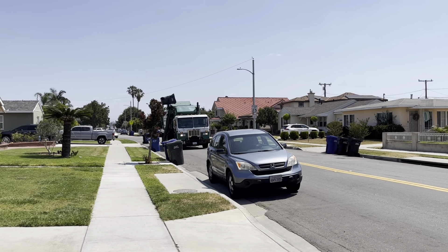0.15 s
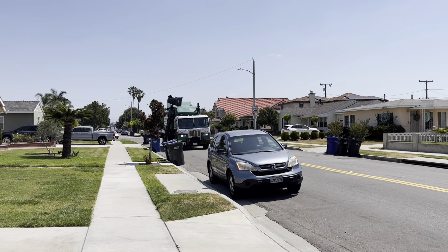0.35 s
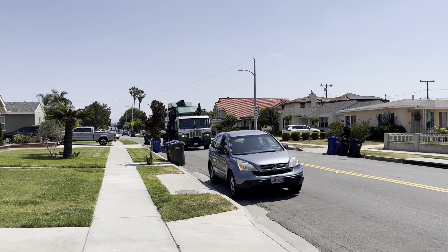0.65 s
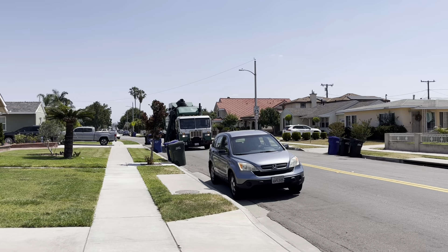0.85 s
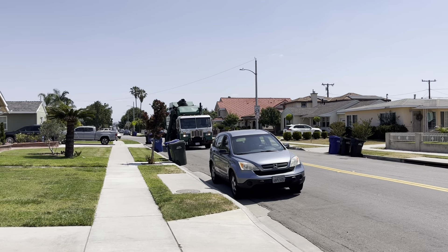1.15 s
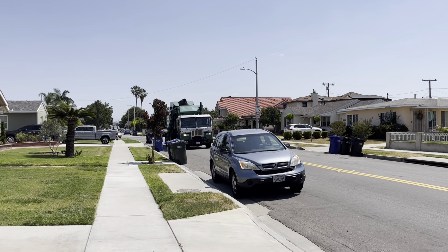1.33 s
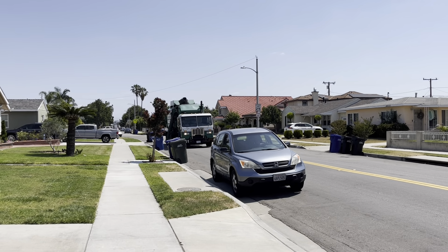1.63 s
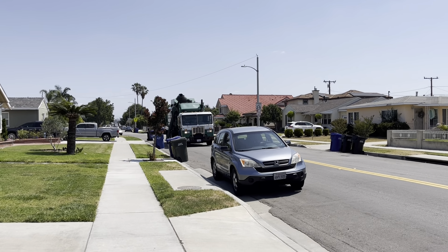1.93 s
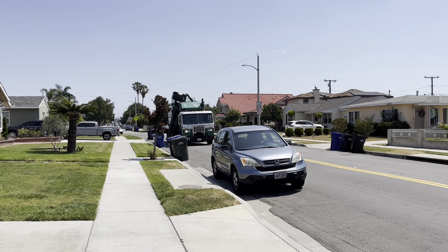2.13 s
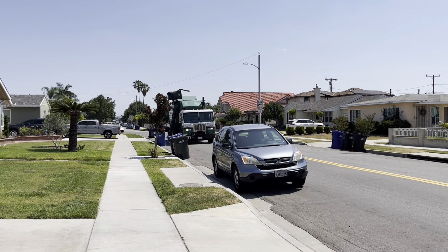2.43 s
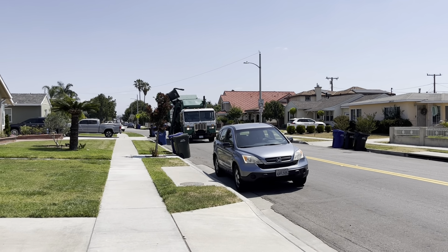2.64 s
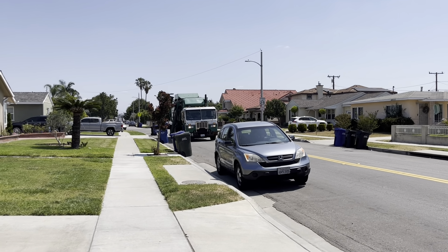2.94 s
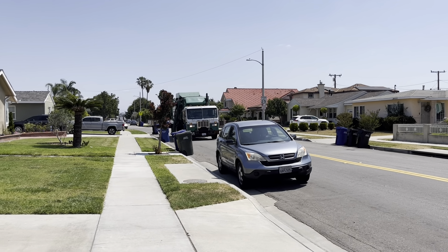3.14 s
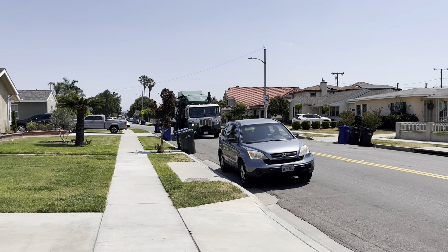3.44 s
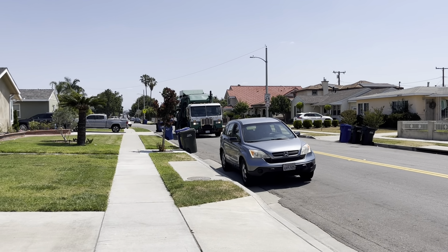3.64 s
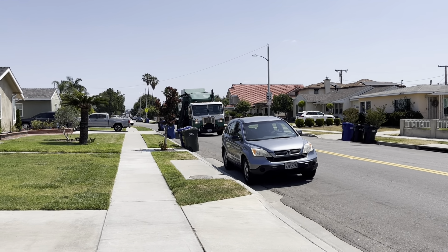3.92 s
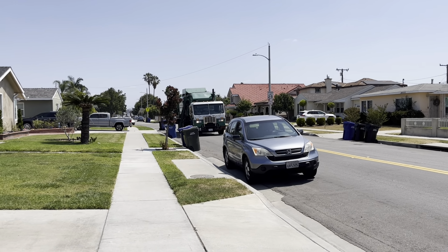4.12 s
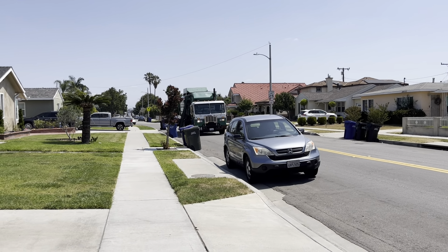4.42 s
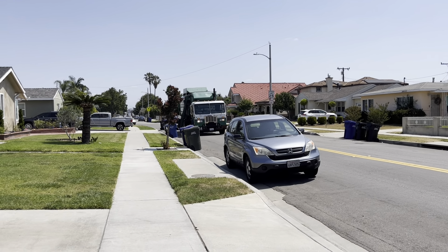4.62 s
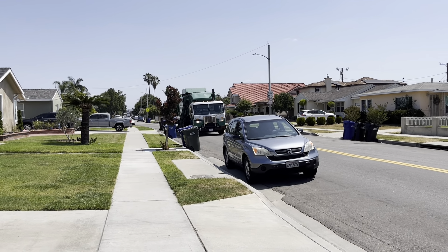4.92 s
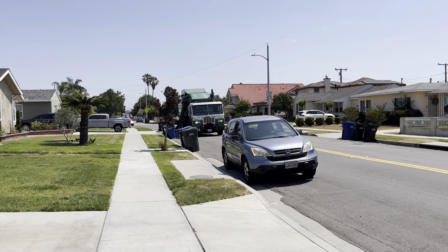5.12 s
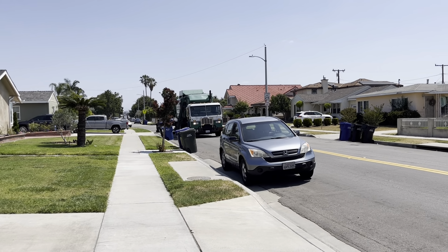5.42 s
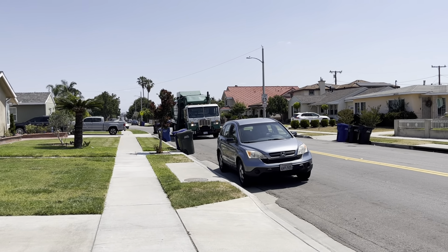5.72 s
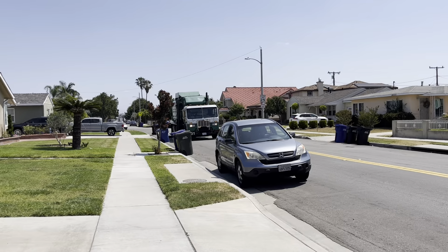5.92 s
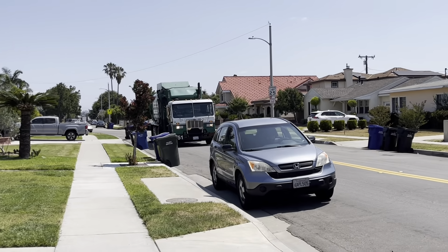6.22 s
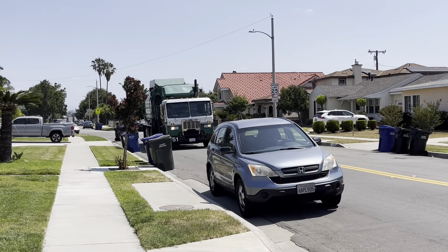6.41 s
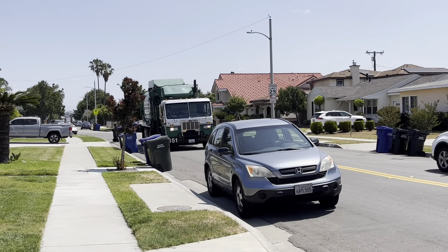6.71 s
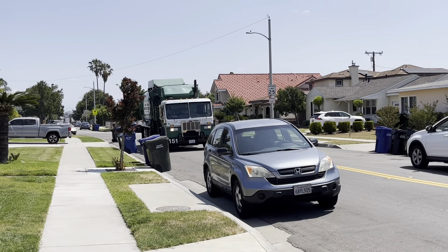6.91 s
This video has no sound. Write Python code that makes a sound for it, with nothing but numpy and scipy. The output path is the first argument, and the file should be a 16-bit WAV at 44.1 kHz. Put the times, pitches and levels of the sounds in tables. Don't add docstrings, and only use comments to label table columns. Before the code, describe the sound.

A garbage truck revs and drones down a suburban street, its arm hissing as plastic carts knock and bang against the steel hopper.

```python
import sys
import numpy as np
from scipy import signal
from scipy.fft import rfft, irfft, next_fast_len
from scipy.io import wavfile
from scipy.ndimage import uniform_filter1d

SR = 44100
rng = np.random.default_rng(int(sys.argv[2]) if len(sys.argv) > 2 else 0)


def to_wav(s):
    ch = np.atleast_2d(s).T
    pcm = np.round(np.clip(ch, -1, 1) * 32767)
    wavfile.write(sys.argv[1], SR, pcm.astype(np.int16))


def rack_gain(trim_db):
    fader = np.asarray(trim_db, float)
    return 10 ** (fader / 20)


N = 311346

# pitch_hz, level_db
RUMBLE_COLOUR = [(20, -28), (35, -4), (60, 7), (110, 4.5), (200, 3), (300, -4), (450, -20.5), (700, -56)]
# start_s, length_s, level_db
RUMBLE_SURGES = [
    (.3, 0.44, -23.5),
    (3.5, 0.19, -29),
    (4.8, 0.28, -24),
    (6.4, .7, -27),
]
# pitch_hz, level_db
WASH_COLOUR = [(200, -28), (400, 2.5), (800, -3), (1400, -7), (1900, -10.5), (2600, -10), (3600, -19.5),
               (5500, -27), (7000, -31), (9500, -34.5), (12500, -39.5), (14000, -38), (16000, -46)]
# time_s, level_db
BODY_WORK = [(0, -43), (.43, -39.5), (.73, -28.5), (1.02, -38), (1.53, -41.5), (2.4, -40.5), (2.83, -37.5),
             (3.13, -39.5), (3.6, -32), (3.95, -31), (4.13, -35), (4.64, -36.5), (4.9, -32), (5.07, -36.5),
             (5.98, -35.5), (6.35, -37.5), (6.63, -33.5), (7.06, -35.5)]
# pitch_hz, level_db
OIL_COLOUR = [(2500, -5), (3600, -2.5), (4300, 2), (5200, 0), (5800, -17), (6600, -15), (7500, -90)]
# start_s, length_s, level_db
ARM_STROKES = [
    (.25, 0.37, -52.5),
    (.65, 0.773, -45.5),
    (1.5, 0.63, -47.5),
    (2.15, 0.59, -43),
    (2.8, 1.3, -48.5),
    (4.85, 0.27, -49.5),
    (5.2, .55, -56),
    (6.4, .1, -51),
]
# start_s, length_s, level_db, pitch_hz
BIRD_WHISTLES = [
    (.015, .028, -67, 5100),
    (.29, 0.067, -53.5, 3340),
    (.345, 0.046, -35, 3400),
    (0.418, .05, -49, 3345),
]
# time_s, pitch_hz, level_db
CAR_HUM = [
    (6.1, 39.1, -44),
    (6.3, 42.04, -43),
    (6.75, 50.8, -38),
    (6.97, 56, -27),
    (7.06, 57, -32),
]
# time_s, pitch_hz, level_db
CAR_GEARS = [
    (6.6, 198, -60),
    (6.75, 203, -42),
    (6.9, 208, -35),
    (6.98, 232, -34),
    (7.06, 240, -27),
]
# time_s, pitch_hz, level_db, octave_db
PUMP_HUM = [(0, 51.94, -24.5, -4), (.2, 57.1, -21.5, -14), (.7, 68.1, -37.5, -3), (1.5, 70.39, -33, 0),
            (2, 67.44, -31, 0), (3.4, 66.82, -32, 0), (4, 70, -34, 0), (5, 67.25, -28, 0),
            (5.5, 69.2, -49, 0), (5.75, 67.7, -29, 0), (6.1, 68.4, -40, 0), (6.5, 66.6, -28, 0),
            (7.06, 67.5, -61, 0)]
# time_s, pitch_hz, level_db, octave_db
EXHAUST_BOOM = [(0, 61, -21, -12), (.1, 72, -22, -14), (.202, 84.1, -21, -18), (.288, 91.2, -14, -16),
                (.378, 96.9, -9, -11), (.436, 101, -10, -19), (.5, 103, -18, -17), (.586, 112.5, -21, -14),
                (.69, 115.5, -27, -2), (.74, 117.4, -17, -12), (.79, 121.4, -30, -2),
                (.898, 128.2, -12.5, -19), (1.03, 130, -21, -19), (1.15, 130, -25, -17),
                (1.35, 126, -40, -8)]
# time_s, firing_cycle_hz
ENGINE_SPEED = [(.4, 12.4), (.6, 14.6), (.8, 15.5), (1.0, 16.2), (1.2, 16.5), (1.6, 16.6), (2.2, 17.7),
                (2.6, 18.5), (3.1, 20.3), (3.5, 18.75), (3.9, 19.2), (4.4, 19.0), (4.8, 19.46),
                (5.4, 20.19), (5.6, 20.13), (6.2, 19.16), (7.05, 20.39)]
# time_s, level_db
ENGINE_LOAD = [(.4, -37.5), (.8, -30.5), (1.0, -35), (1.4, -40), (1.7, -37.5), (2.4, -38.5), (2.7, -39.5),
               (3.05, -41), (3.65, -42), (4.2, -40.5), (4.5, -35), (5.4, -33), (6.2, -32), (6.6, -32.5),
               (7.05, -38)]
# order, level_db against the load
LOADED_ORDERS = [(6, 1), (7, -0.5), (8, -4), (9, -6), (10, -9.5), (11, -30.5), (12, -20), (13, -12),
                 (14, -18)]
# order, level_db
STEADY_ORDERS = [(2, -47.5), (3, -38), (4, -47), (5, -42.5), (15, -49)]
# start_s, length_s, level_db
PANELS_ORDER_3 = [
    (0.642, 0.64, -22.5),
    (1.343, 1.1, -27.5),
    (2.515, 1.2, -34),
    (5.199, 1.3, -33.5),
]
# start_s, length_s, level_db
PANELS_ORDER_5 = [
    (.9, 0.44, -32),
    (1.5, .8, -33.5),
    (2.4, 0.52, -25),
    (3.1, 0.18, -29),
    (3.35, 0.31, -27),
    (4.4, 0.85, -31),
    (5.1, .8, -22.5),
    (6.349, 0.33, -33),
]
# start_s, length_s, level_db
PANELS_ORDER_15 = [
    (1.0, 1.56, -44),
    (5.0, 1, -42.5),
]
# start_s, peak_db, pitch_hz
JOINT_SQUEAKS = [
    (4.805, -43, 7970),
    (4.8693, -46, 8360),
    (4.9092, -51, 8380),
    (5.023, -41, 8200),
    (5.0993, -41, 8400),
    (5.1442, -42.5, 8100),
    (5.2749, -48, 8140),
    (5.3727, -55, 7830),
    (7.0234, -45, 7600),
]
# start_s, level_db, centre_hz, length_s
AIR_PUFFS = [(.538, -47, 2360, 0.034), (.635, -43, 3400, 0.133), (1.045, -42.5, 8700, 0.091),
             (3.28, -41, 3300, 0.04), (3.417, -45, 6760, 0.037), (3.412, -36, 1150, 0.06),
             (4.76, -30.5, 288, 0.062), (4.9, -47.5, 4400, 0.18), (5.6, -45.5, 7850, 0.089),
             (5.62, -41.5, 3940, 0.049), (6.442, -38, 3680, 0.056)]
# start_s, peak_db, pitch_hz
STEEL_PINGS = [(0.536, -48, 5340), (0.537, -35, 3060), (0.561, -46, 4310), (0.565, -39, 2890),
               (0.635, -40, 4130), (0.653, -41, 4610), (0.653, -22, 650), (0.659, -35, 3320),
               (0.674, -36, 2540), (0.678, -41, 5000), (0.683, -36, 3060), (0.684, -37, 3920),
               (0.684, -27, 730), (0.696, -39, 4690), (0.705, -28, 1420), (0.715, -31, 2330),
               (0.729, -39, 3880), (0.749, -42, 5340), (0.75, -35, 2240), (0.757, -40, 4350),
               (0.76, -23, 560), (0.771, -29, 1420), (0.824, -42, 3490), (2.407, -38, 5040),
               (2.413, -32, 2540), (2.414, -33, 3100), (2.415, -35, 1290), (2.416, -40, 4050),
               (2.422, -39, 5170), (2.423, -35, 1510), (2.426, -35, 2970), (2.429, -40, 4130),
               (2.439, -35, 2930), (2.459, -40, 1510), (2.549, -41, 4350), (2.573, -40, 4010),
               (2.741, -39, 4480), (2.742, -42, 3010), (2.746, -42, 5170), (2.759, -43, 3060),
               (3.115, -26, 860), (3.121, -41, 5000), (3.121, -28, 1890), (3.137, -45, 4480),
                 (3.14, -30, 1120), (3.146, -44, 4180), (3.149, -37, 2330), (3.155, -31, 470),
                 (3.16, -37, 2020), (3.177, -40, 3270), (3.178, -39, 2070), (3.189, -39, 1940),
                 (3.278, -32, 3010), (3.294, -37, 3100), (3.302, -36, 3100), (3.313, -38, 2970),
                 (3.415, -44, 4950), (3.416, -45, 3920), (3.418, -28, 1030), (3.433, -37, 2890),
                 (3.436, -43, 5080), (3.442, -39, 2890), (3.442, -29, 1030), (3.461, -44, 3830),
                 (3.473, -45, 5250), (3.475, -28, 1340), (3.488, -45, 5040), (3.491, -44, 4010),
                 (3.628, -18, 560), (3.629, -25, 2110), (3.647, -40, 3880), (3.654, -29, 2670),
                 (3.654, -22, 650), (3.655, -39, 5120), (3.664, -23, 730), (3.694, -42, 4050),
                 (3.833, -24, 4010), (3.833, -23, 1420), (3.834, -27, 5080), (3.834, -23, 3190),
                 (3.837, -25, 900), (3.843, -25, 1340), (3.88, -38, 5170), (3.893, -34, 2240),
                 (3.894, -27, 1550), (3.903, -34, 2630), (3.904, -40, 4220), (3.912, -40, 4090),
                 (3.922, -32, 2410), (3.924, -38, 4090),
               (4.769, -35, 1720), (4.794, -36, 2280), (4.803, -43, 3190), (4.812, -24, 470),
               (4.817, -42, 3140), (4.945, -46, 4260), (4.949, -38, 2500), (4.97, -47, 5210),
               (4.985, -45, 4310), (5.006, -40, 4390), (5.007, -44, 5120), (5.019, -45, 5210),
               (5.021, -45, 4390), (5.036, -41, 3010), (5.072, -42, 2890), (5.619, -42, 2710),
               (5.629, -42, 2800), (5.655, -43, 4350), (6.452, -39, 3700), (6.475, -45, 4780),
               (6.482, -40, 2930), (6.486, -42, 3750), (6.503, -42, 4570), (6.541, -33, 1510)]
# start_s, peak_db, pitch_hz, length_s
CART_KNOCKS = [(.535, -37, 950, 0.0074), (.55, -32, 1395, 0.014), (.637, -29, 712, 0.024),
               (.64, -23.5, 1132, 0.022), (.655, -17, 191, 0.024), (.719, -8.5, 681, 0.011),
               (.74, -32, 130.1, 0.052), (1.86, -30.5, 697.7, 0.01), (3.116, -32, 874, 0.0067),
               (3.275, -26.5, 965, 0.013), (.2, -26, 139, .09), (.74, -24, 150, .04), (1.22, -34, 205, .2),
               (3.3, -38, 3300, .02), (.535, -34, 2400, .006), (.02, -26, 95, .07), (3.46, -30, 1500, .02),
               (3.64, -25, 1250, .03), (3.672, -25, 680, .012), (.645, -26, 1250, .02),
               (6.46, -29, 185, .07), (6.79, -29, 168, .07), (.72, -25.5, 228.5, .07),
               (.685, -25, 1404, 0.023), (6.445, -28.5, 624, .02), (3.45, -28.5, 1390, 0.027),
               (3.607, -23, 877, 0.006), (3.28, -36, 3100, .04), (3.64, -26, 1450, .02),
               (3.629, -19, 515, 0.01), (3.63, -18, 903, 0.019), (3.631, -24, 1320, 0.012),
               (3.9, -25.5, 275, 0.031), (4.7785, -12, 120, 0.006), (4.786, -14, 230, .004),
               (4.7975, -5.5, 230, 0.005), (4.8095, -8, 170, 0.004), (4.8215, -11, 190, .004),
               (4.797, -34, 394, 0.01), (4.8, -24, 615, 0.0043), (4.806, -13, 91, 0.018),
               (4.830, -9, 141, 0.011), (6.448, -30, 1458, 0.008), (6.461, -24.5, 1440, .012),
               (6.45, -32, 430, .04)]
# start_s, peak_db, t60_s, ring_hz
STEEL_TAPS = [
    (.819, -26, .23, 1800),
    (2.608, -33, 0.3, 2319),
    (2.9149, -33.5, .3, 1710),
    (3.053, -29.5, 0.26, 2550),
    (3.1145, -17, .2, 2700),
]
# start_s, peak_db, t60_s, ring_hz
STEEL_CLANKS = [
    (1.4254, -40.5, 0.26, 1710),
    (2.4057, -26, 0.36, 2900),
    (2.734, -28, 0.2, 2410),
    (3.2735, -25, 0.22, 3050),
    (3.826, -24, .1, 2440),
    (3.829, -14, 0.25, 2900),
]
# start_s, peak_db, t60_s, ring_hz
HOPPER_THUDS = [(.533, -23.5, 0.36, 2900), (.9379, -37, 0.21, 2555), (1.8176, -34.5, 0.54, 2370),
                (3.121, -26, 0.5, 1950), (3.6, -28, .1, 1730), (3.7404, -25, 0.28, 2100),
                (3.8692, -23, .36, 2470), (4.4288, -37, 0.44, 2420), (4.7604, -30, 0.34, 1800),
                (4.9242, -29.5, 0.32, 2380), (6.4449, -30, .8, 3700), (6.6755, -33.5, 0.4, 2120)]
# start_s, peak_db, t60_s, ring_hz
HOPPER_SLAMS = [(.632, -18.5, 0.32, 1844), (.6593, -26, 0.5, 1690), (.6889, -26.5, 0.35, 1730),
                (.7175, -22, 0.11, 2500), (.7538, -25, .15, 3000), (3.4146, -26.5, 0.45, 2160),
                (3.4491, -31, 0.77, 2420), (3.6285, -17, .24, 2080), (5.0092, -29.5, 0.26, 1720),
                (6.1894, -46, .6, 2300), (6.93, -46, 0.57, 1800)]
# pitch_hz, t60_s
HOUSE_DECAY = [(200, 0.18), (1000, 0.76), (4000, 0.66), (12000, 0.3)]
# pitch_hz, left_lead_rad, left_minus_right_db, likeness_0_to_1
PORT_RESPONSE = [(0, -.05, -.55, 1), (150, -.09, -.7, .999), (350, -.25, -.5, .98), (700, -.35, 1.8, .92),
                 (1200, -.4, 3.6, .86), (1800, 0, 1, .75), (2600, 1.8, .5, .66), (4200, .9, -1, .62),
                 (5000, 1.3, -.7, .55), (6000, 3.14, 0, .97), (8000, 6.28, 0, .99), (10300, 9.42, 0, .995),
                 (12500, 12.57, 0, .995), (14700, 15.7, 0, .995), (17000, 18.8, 0, .995)]


def evened(x):
    return x / np.sqrt(np.mean(x ** 2) + 1e-20)


def read(points, hz):
    f, value = np.transpose(points)
    return np.interp(np.log(hz + 1), np.log(f + 1), value)


def curves(rows, t):
    s, *columns = np.transpose(rows)
    return [np.interp(t, s, c) for c in columns]


def add(mix, s, sound):
    part = mix[round(s * SR):][:len(sound)]
    part += sound[:len(part)]


def filtered(x, order, hz, kind):
    return signal.sosfilt(signal.butter(order, hz, kind, fs=SR, output="sos"), x)


def band(x, lo_hz, hi_hz):
    return filtered(x, 3, [lo_hz, min(hi_hz, SR / 2 - 500)], "band")


def wander(per_s):
    knots = rng.standard_normal(300)
    return uniform_filter1d(np.interp(np.arange(N) / SR * per_s, np.arange(300), knots), 800)


def swells(rows, rise_s, fall_s):
    t = np.arange(N) / SR
    gain = np.zeros(N)
    for s, length, db in rows:
        rise = np.clip((t - s) / rise_s + .5, 0, 1)
        fall = np.exp(-np.maximum(t - s - length, 0) / fall_s)
        gain += rack_gain(db) * rise * fall
    return gain


def haze(colour, level_db, tilt_db, patchy_db, flicker_db, size=512):
    hop = size // 4
    frames, hz = N // hop + 5, np.fft.rfftfreq(size, 1 / SR)
    a, b, patches = rng.standard_normal((frames, len(hz), 3)).T
    patches = evened(uniform_filter1d(uniform_filter1d(patches, 6, 0), 16, 1))
    flicker = evened(uniform_filter1d(rng.standard_normal(frames), 5))
    z = (a + 1j * b) * rack_gain(read(colour, hz)[:, None] + patchy_db * patches + flicker_db * flicker)
    at = np.minimum(np.arange(frames) * hop, N - 1)
    treble = np.clip(np.log2((hz + 1) / 2500), 0, 2)[:, None]
    scale = np.std(signal.istft(z, nperseg=size, noverlap=size - hop)[1])
    noise = signal.istft(z * rack_gain(treble * tilt_db[at]), nperseg=size, noverlap=size - hop)[1][:N]
    return rack_gain(level_db) * noise / scale


def street_rumble():
    t, flat = np.arange(N) / SR, np.zeros(N)
    (work_db,), (load_db,) = curves(BODY_WORK, t), curves(ENGINE_LOAD, t)
    level_db = -30.5 + 0.44 * (work_db - work_db.mean()) + 0.34 * (load_db - load_db.mean())
    level = np.hypot(rack_gain(level_db), swells(RUMBLE_SURGES, 0.4, .1))
    return level * haze(RUMBLE_COLOUR, flat, flat, 1.8, 1.0, size=2048)


def body_wash():
    (work_db,) = curves(BODY_WORK, np.arange(N) / SR)
    return np.array([haze(WASH_COLOUR, work_db, np.full(N, 2.3), 1.67, 1.0) for _ in "ab"])


def oil_hiss():
    flat = np.zeros(N)
    flow = np.hypot(rack_gain(-53.5), swells(ARM_STROKES, 0.14, 0.048))
    return np.array([flow * haze(OIL_COLOUR, flat, flat, 1.6, 0.5) for _ in "ab"])


def bird_whistle(length, db, hz):
    t = np.arange(0, length, 1 / SR)
    return rack_gain(db) * signal.windows.tukey(len(t), .6) * np.sin(2 * np.pi * hz * t)


def machine_hum(rows, octave_db, fade_s):
    t = np.arange(N) / SR
    hz, one_db, *own_db = curves(rows, t)
    two_db = one_db + octave_db + sum(own_db)
    turn = 2 * np.pi * np.cumsum(hz) / SR
    alive = np.clip((rows[-1][0] + fade_s - t) / fade_s, 0, 1)
    one = rack_gain(one_db + 2.3 * wander(25.)) * np.sin(turn + 0.25 * wander(22.0))
    two = rack_gain(two_db + 2.4 * wander(20.)) * np.sin(2 * turn + 0.79 * wander(20.))
    three = rack_gain(two_db - 17.0 + 1.2 * wander(39.0)) * np.sin(3 * turn + 1.7 * wander(20.))
    return np.sqrt(2) * alive * (one + two + three)


def diesel():
    t = np.arange(N) / SR
    (hz,), (load_db,) = curves(ENGINE_SPEED, t), curves(ENGINE_LOAD, t)
    turn = 2 * np.pi * np.cumsum(hz) / SR
    gains = {k: rack_gain(load_db + db + 2.7 * wander(8.4)) for k, db in LOADED_ORDERS}
    gains.update({k: rack_gain(db + 0.86 * wander(5.1)) for k, db in STEADY_ORDERS})
    for k, rows in ((3, PANELS_ORDER_3), (5, PANELS_ORDER_5), (15, PANELS_ORDER_15)):
        gains[k] = np.hypot(gains[k], swells(rows, 0.065, 0.11))
    out = np.zeros(N)
    for k, gain in gains.items():
        out += gain * np.sin(k * turn + 2 * np.pi * rng.random() + 0.065 * k * wander(6.8))
    return np.sqrt(2) * out * np.clip((t - .3) / 0.5, 0, 1)


def squeak(db, hz):
    t = np.arange(350) / SR
    return rack_gain(db + 1.5) * np.hanning(350) * np.sin(2 * np.pi * hz * (t + 4.1 * t ** 2))


def puff(db, hz, length):
    t = np.arange(0, length + 0.027, 1 / SR)
    shape = np.clip(t / 0.02, 0, 1) * np.exp(-np.maximum(t - length, 0) / 0.033)
    noise = rng.standard_normal(SR // 2)[:len(t)]
    return rack_gain(db) * shape * evened(band(noise, .72 * hz, 1.55 * hz))


def knock(db, hz, length):
    t = np.arange(0, 3 * length, 1 / SR)
    shape = np.clip(t / (0.3 * length), 0, 1) * np.exp(-(t / length) ** 3)
    return rack_gain(db) * np.sin(2 * np.pi * hz * t) * shape


def ping(db, hz):
    octaves = abs(np.log2(hz / 2800)) * (1 + (hz > 2800))
    return knock(db + 5.5 - 2.6 * octaves, hz, .0055)


def bang(db, dull_db, bright_db, rise_s, t60, hz):
    t = np.arange(SR // 2) / SR
    lumps = evened(uniform_filter1d(rng.standard_normal(len(t)), 150)) * np.clip(t / 0.027, 0, 1)
    rattle = rng.standard_normal(len(t)) * rack_gain(3.6 * np.minimum(lumps, 1))
    rattle[30] += 5
    crack = np.clip(t / rise_s, 0, 1) * (1 + 0.5 * np.exp(-t / 0.012))
    snap = np.clip(t / 0.0015, 0, 1) * (1 + 0.6 * np.exp(-t / 0.01))
    sizzle = np.clip(t / 0.0055, .3, 1) * (1 + 0.59 * np.exp(-t / 0.0093))
    dull = rack_gain(dull_db - 60 * (t / (0.81 * t60)) ** 1.11) * evened(band(rattle, 380, 1580))
    middle = rack_gain(-60 * t / t60) * evened(band(rattle, 1507, 3000))
    upper = rack_gain(0.75 * bright_db + 6.0 - 60 * t / (1.07 * t60)) * evened(band(rattle, 3010, 7040))
    bright = rack_gain(bright_db + 1.5 - 60 * t / (0.69 * t60)) * sizzle * evened(band(rattle, 9000, 17000))
    ring = rack_gain(-5.5 - 60 * t / (0.53 * t60)) * evened(band(rattle, 0.934 * hz, 1.068 * hz))
    return rack_gain(db - 8.5) * (crack * (dull + middle + ring) + snap * (upper + bright))


def houses(x):
    taps = np.zeros((2, SR))
    at = np.arange(400, SR - 20, 20) + rng.integers(0, 20, (2, (SR - 401) // 20))
    np.put_along_axis(taps, at, rng.choice([-1., 1.], at.shape), 1)
    hz, t, z = signal.stft(taps, SR, nperseg=256)
    tail = signal.istft(z * rack_gain(-60 * t / read(HOUSE_DECAY, hz)[:, None]), SR, nperseg=256)[1]
    return signal.fftconvolve(x[None], tail / np.linalg.norm(tail[0]), axes=1)[:, :N]


def ports(pair, delay_share, lead=0.):
    size = next_fast_len(N + 2048)
    hz = np.fft.rfftfreq(size, 1 / SR)
    phase, balance_db, same = curves(PORT_RESPONSE, hz)
    a, b = rfft(pair, size)
    spread = np.arccos(np.clip(same, 0, 1)) / 2
    turn = np.exp(.5j * (delay_share * phase + lead)) * rack_gain(balance_db / 2)
    left = (np.cos(spread) * a + np.sin(spread) * b) * turn
    right = (np.cos(spread) * a - np.sin(spread) * b) / turn
    return irfft(np.array([left, right]), size)[:, :N]


def scene():
    hits, knocks, bird = np.zeros((3, N))
    # dull part dB, bright part dB, rise s
    for table, kind in ((HOPPER_SLAMS, (4.5, -16, .002)), (HOPPER_THUDS, (3.5, -19.5, .003)),
                        (STEEL_CLANKS, (-5.5, -9.5, .006)), (STEEL_TAPS, (-5, -26, .001))):
        for s, db, t60, hz in table:
            add(hits, s, bang(db, *kind, t60, hz))
    pings = STEEL_PINGS
    for table, source, mix in ((CART_KNOCKS, knock, knocks), (AIR_PUFFS, puff, hits), (JOINT_SQUEAKS, squeak, hits),
                               (BIRD_WHISTLES, bird_whistle, bird), (pings, ping, knocks)):
        for s, *row in table:
            add(mix, s, source(*row))
    background = body_wash() + street_rumble() * [[1], [0]]
    drone = diesel() + machine_hum(EXHAUST_BOOM, -0.5, 0.12) + machine_hum(PUMP_HUM, -6.5, .1)
    drone += machine_hum(CAR_HUM, -14.0, .1) + machine_hum(CAR_GEARS, -22.0, .1)
    struck = hits + knocks
    direct = np.array([struck + drone, 0.99 * np.roll(struck, 170)])
    echoes = rack_gain(-9.0) * houses(hits + rack_gain(-5.0) * knocks)
    truck = ports(background + direct + echoes, 1)
    oil = ports(oil_hiss(), 0, lead=-0.57)
    return truck + oil + bird * [[1], [-.8]]


def band_limit(x):
    return signal.sosfilt(signal.butter(12, 15820, fs=SR, output="sos"), x)


def record(dry):
    before = np.pad(dry, ((0, 0), (4000, 0)), "reflect", reflect_type="odd")
    cut = filtered(before, 2, 35., "high")
    cut = filtered(cut, 3, 12500., "low")[:, -N:]
    middle = cut.mean(0)
    full_null = signal.sosfiltfilt(signal.butter(4, (5720, 6260), "band", fs=SR, output="sos"), middle)
    part_null = signal.sosfiltfilt(signal.butter(2, (2350, 2900), "band", fs=SR, output="sos"), middle)
    late = np.clip((np.arange(N) / SR - 6.08) / .05, 0, 1)
    finished = cut - (full_null + .35 * part_null) * late
    return band_limit(finished)


dry = scene()
out = record(dry)
to_wav(out)
```